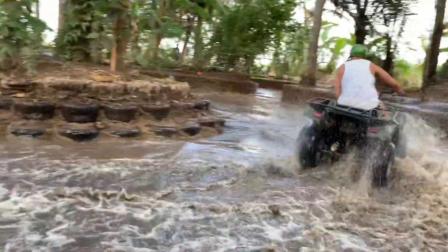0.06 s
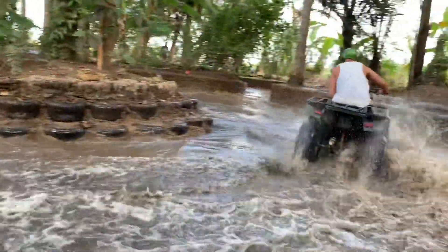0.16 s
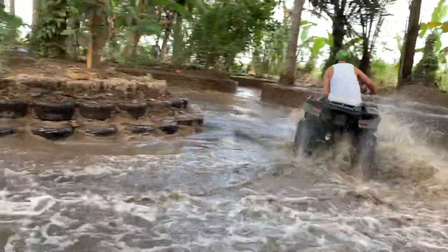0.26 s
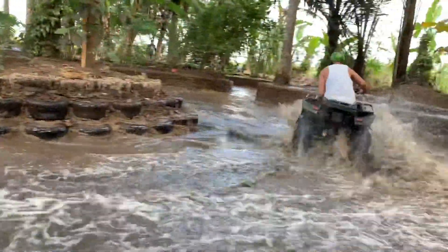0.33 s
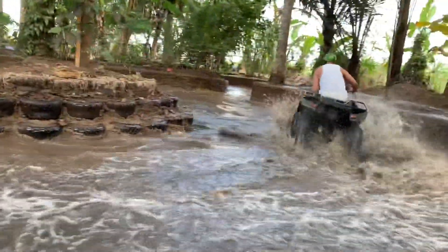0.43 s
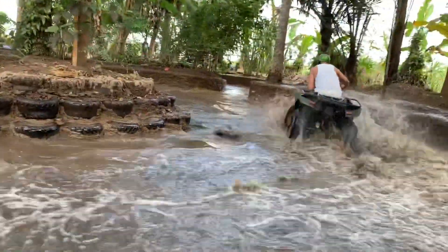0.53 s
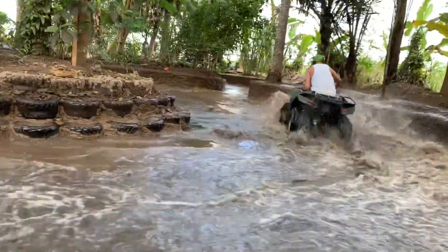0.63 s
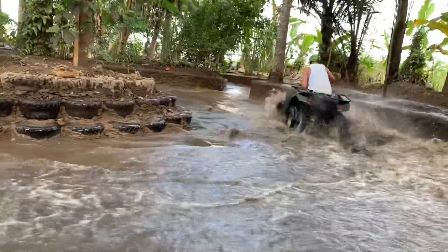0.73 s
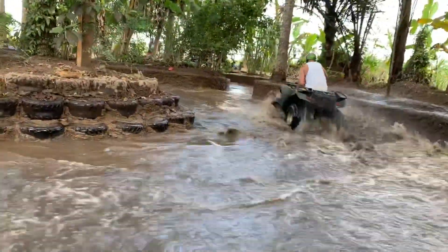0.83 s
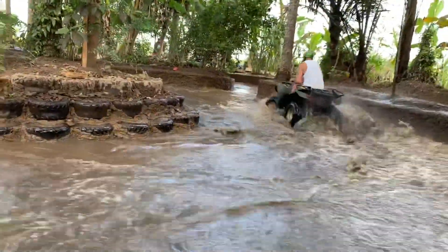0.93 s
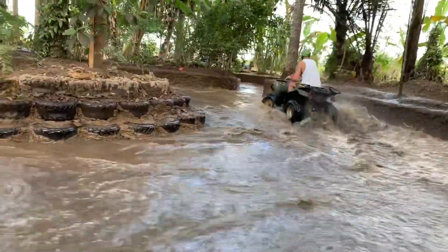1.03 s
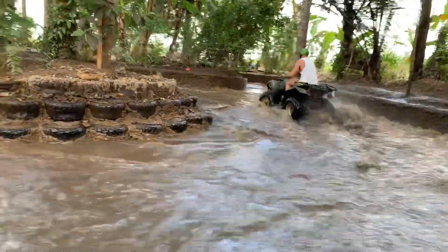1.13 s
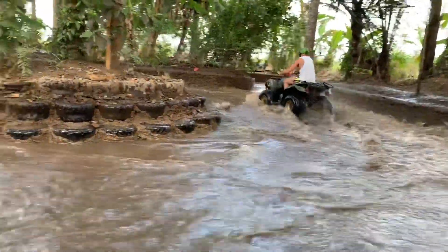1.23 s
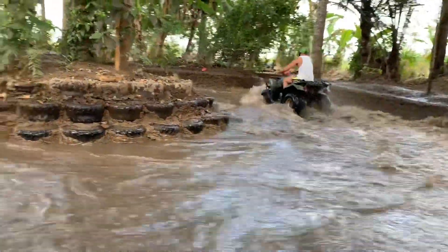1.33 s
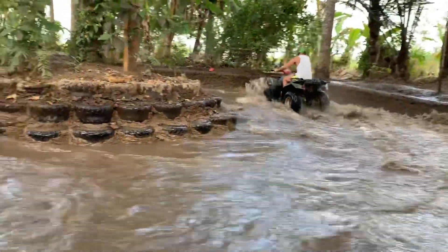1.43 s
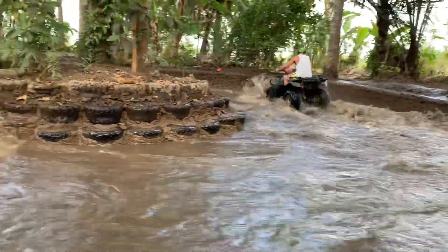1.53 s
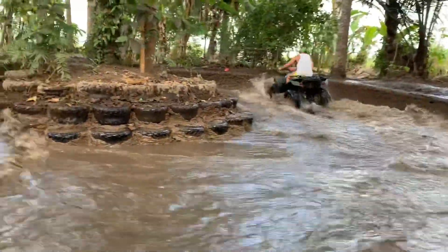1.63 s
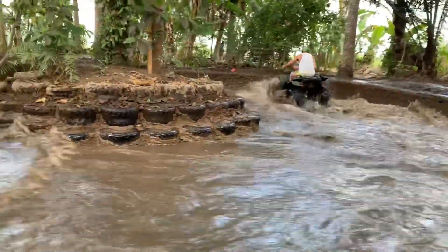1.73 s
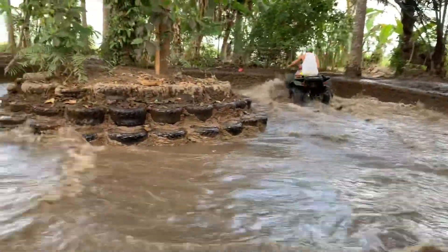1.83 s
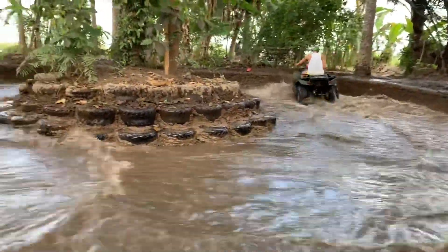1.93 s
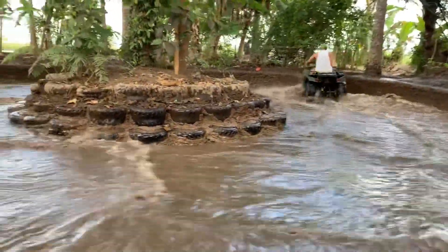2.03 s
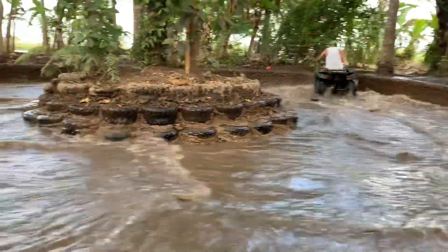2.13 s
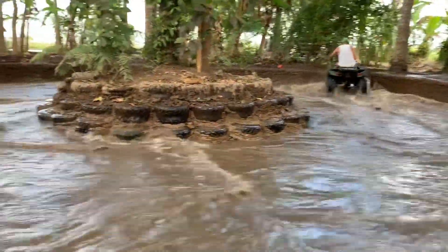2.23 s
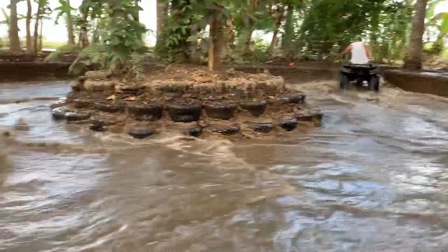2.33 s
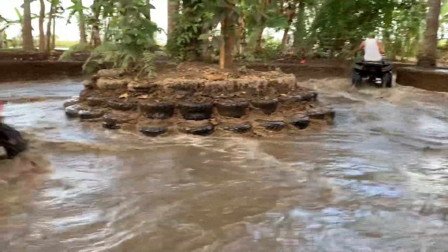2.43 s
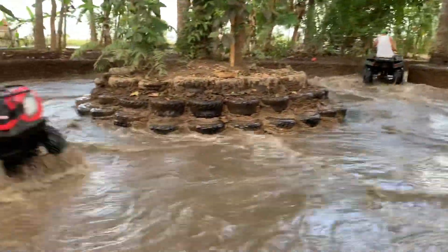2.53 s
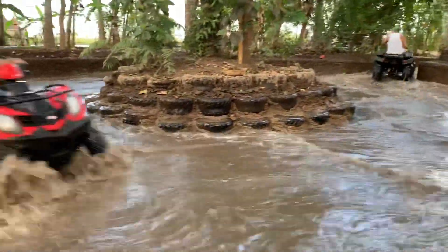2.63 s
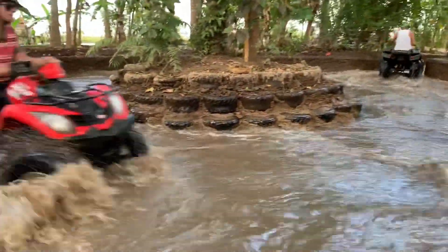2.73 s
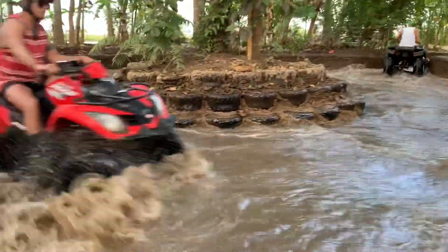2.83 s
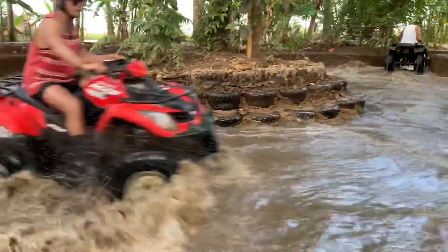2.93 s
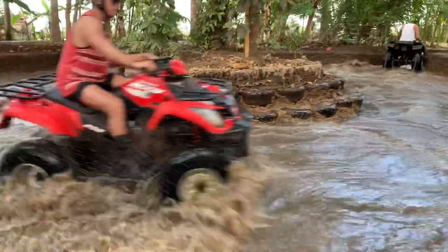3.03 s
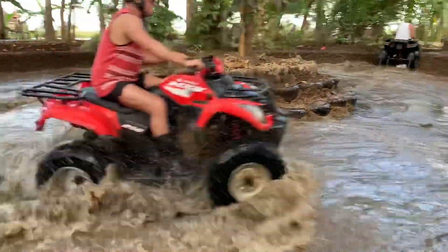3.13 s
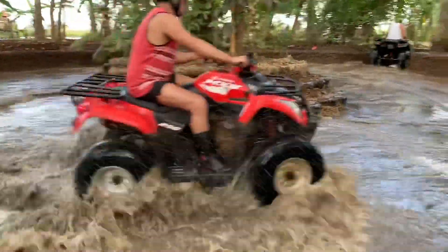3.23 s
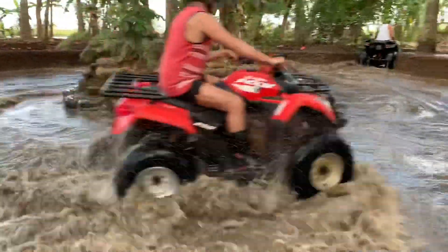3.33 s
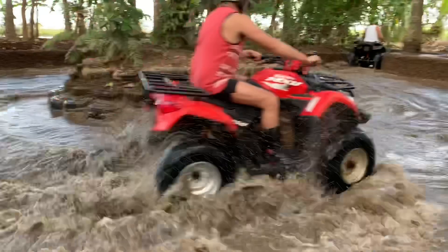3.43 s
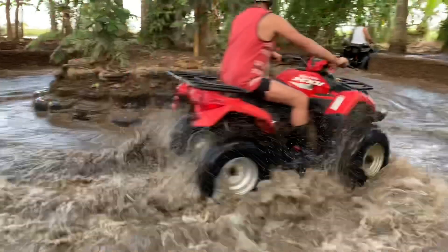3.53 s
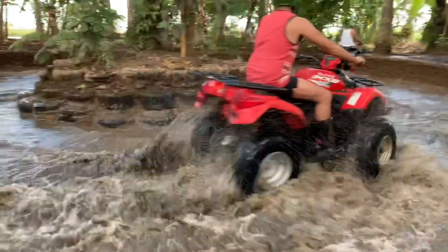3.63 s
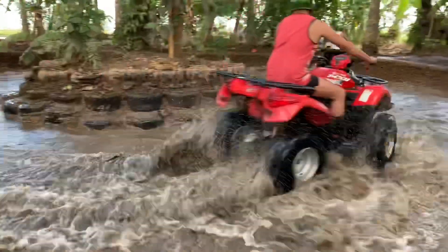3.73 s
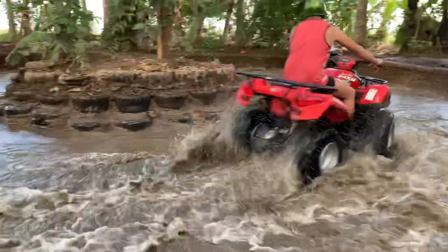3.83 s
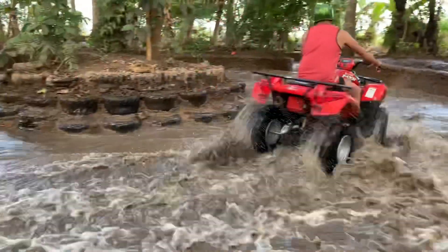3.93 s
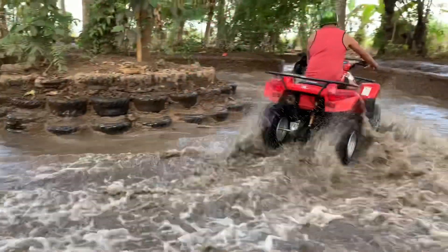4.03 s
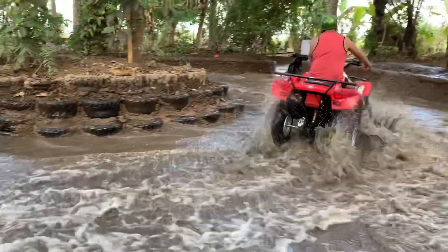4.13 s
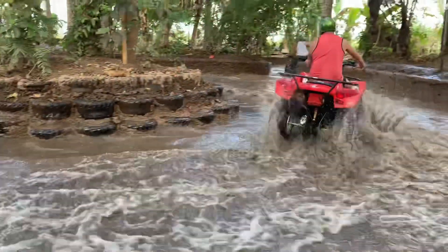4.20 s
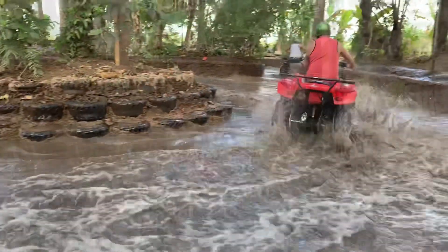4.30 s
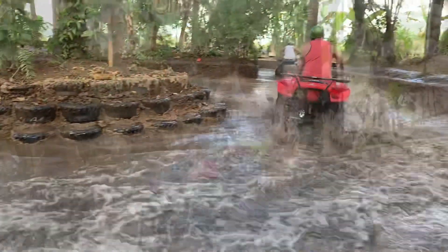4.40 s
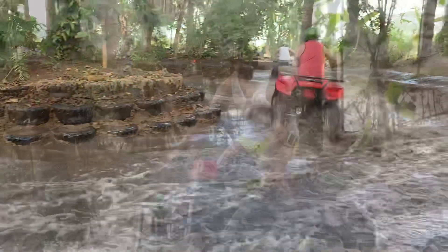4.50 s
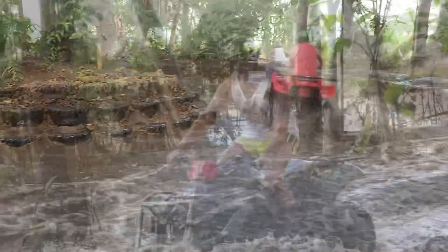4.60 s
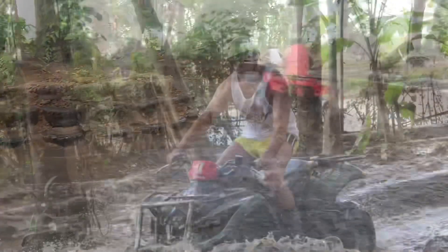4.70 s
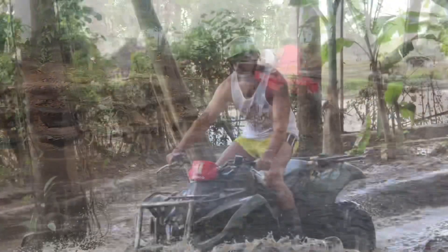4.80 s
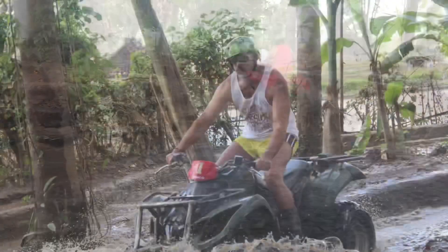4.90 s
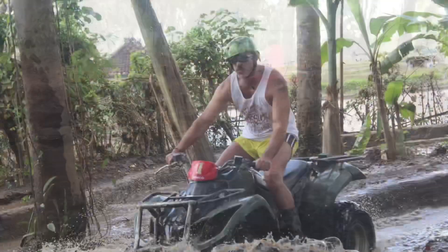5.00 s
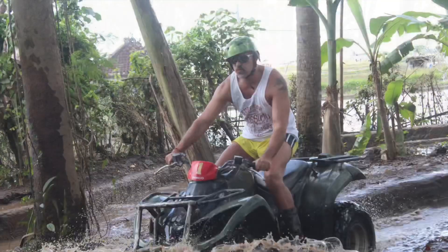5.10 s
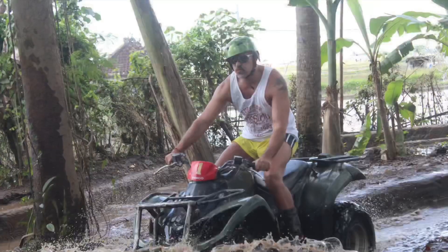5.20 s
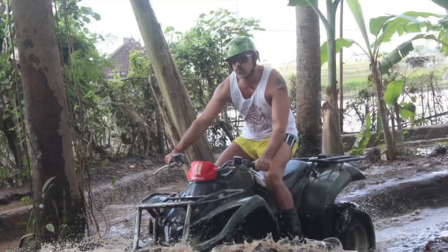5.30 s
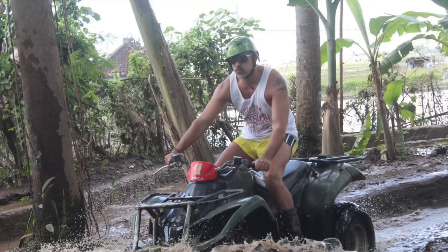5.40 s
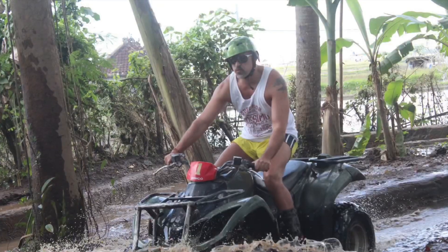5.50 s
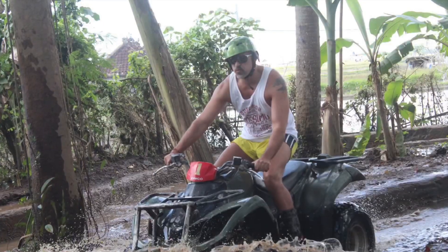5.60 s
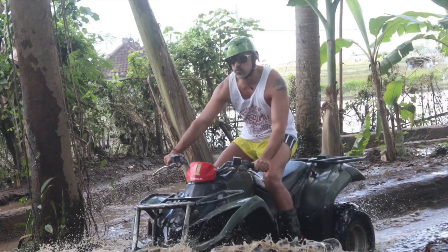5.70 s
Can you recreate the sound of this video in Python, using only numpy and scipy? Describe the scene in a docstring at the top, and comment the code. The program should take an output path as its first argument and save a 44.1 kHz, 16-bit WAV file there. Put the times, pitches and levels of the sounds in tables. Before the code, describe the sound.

Wide stereo, close outdoor pickup: continuous churning, fizzing water under two thumping single-cylinder engines. The first barks with gassy hiss, drops in speed, then gets another shorter push of throttle. The second grows from a low drone to a loud growl as it goes by, throwing heavy splashes and a big watery plop, then opens up and recedes. Short diffuse reflections from banks and trees; a gradual fade closes it.

```python
"""A muddy water pit among banks and trees: two single-cylinder quad bikes churn through it, close by.
The first blips its throttle and pulls away; the second comes up, revs past and follows it.
Each engine is a train of kicks through an exhaust colour, with a hiss of gas on every stroke.
Shaped noise and bubble rings make the water; slaps, gulps, fuzzy tones and whistles stand out from it.
Near the end a low engine hum swells again, and the whole sound fades out."""
import sys
import numpy as np
from scipy import signal
from scipy.fft import rfft, irfft, next_fast_len
from scipy.io import wavfile
from scipy.ndimage import map_coordinates

SR = 44100
rng = np.random.default_rng(int(sys.argv[2]) if len(sys.argv) > 2 else 0)


def generate_wav(sig):
    """Save sig (samples, or channels by samples) to the path in sys.argv[1] as 16-bit PCM at SR."""
    pcm = np.round(np.clip(np.atleast_2d(sig).T, -1, 1) * 32767).astype(np.int16)
    wavfile.write(sys.argv[1], SR, pcm)


N = 253575  # length in samples

# Engine speed of each quad. Each row: time in seconds, firings per second.
LEADER_SPEED = [(0, 31.43), (.07, 31.94), (.17, 33.85), (.25, 27.11), (.45, 24.33), (.62, 23.99),
                (.76, 26.06), (.9, 26.81), (1.08, 26.5), (1.33, 24.8), (1.65, 27), (1.95, 28.2), (3, 27.1)]
FOLLOWER_SPEED = [(0, 30.35), (1.25, 30.12), (1.45, 31.19), (2.14, 30.49), (2.38, 28.69), (2.57, 29.82),
                  (2.95, 30.19), (3.42, 32.66), (3.64, 32.93), (3.8, 35.77), (4.2, 35.91), (4.39, 34.95),
                  (4.55, 32.36), (4.76, 31.79), (5.2, 27.7)]
# What each exhaust passes, throttle closed and wide open. Each row: frequency in Hz, relative level in dB.
LEADER_PIPE = [(20, -44.5), (30, -15.5), (52, -10), (74, -1.5), (85, -3), (94, 9), (112, 7), (123, 6),
               (136, -8), (160, -15.5), (215, -13), (290, -26.5), (420, -27), (900, -45.5), (3000, -75.5)]
LEADER_OPEN_PIPE = [(20, -45), (32, -11), (60, -5.5), (82, -6), (100, 4), (130, 7.5), (160, 3.5),
                    (195, 2.5), (225, -3.5), (258, -3), (320, -14), (430, -12), (700, -25.5), (1200, -28.5),
                    (3000, -49.5)]
FOLLOWER_PIPE = [(20, -58.5), (31, -5), (61, 5.5), (92, -2), (108, 3.5), (124, 12), (134, 12.5), (150, 2.5),
                 (165, 1), (185, -3.5), (215, -1.5), (255, -3), (330, -14.5), (500, -29.5), (900, -43),
                 (3000, -57.5)]
FOLLOWER_OPEN_PIPE = [(20, -47), (34, -8), (70, -.5), (106, 2.5), (140, 2), (178, .5), (215, -1.5),
                      (248, -8), (290, -14), (340, -15), (430, -16), (700, -31), (1200, -35), (3000, -54)]
# Colour of each exhaust's hiss. Each row: frequency in Hz, relative density in dB per Hz.
LEADER_RASP = [(200, -6), (400, -4), (750, -8), (1030, -4.5), (1280, -8), (1560, -2.5), (1900, -4),
               (2350, 2), (3000, -20), (4200, -9), (5600, -15), (7800, -10), (10000, -10), (13500, -28),
               (16000, -24.5)]
FOLLOWER_RASP = [(200, -12), (500, -6), (1100, -11), (2100, -9.5), (3000, -4.5), (4100, -1.5), (5600, -9),
                 (7800, -2), (10000, -11.5), (13500, -13), (16000, -13.5)]
# Each quad drives straight past. The row: time when closest in seconds, closest distance in metres,
# speed in metres per second.
LEADER_PASS = (-0.46, 2.2, 2.15)
FOLLOWER_PASS = (3.61, 2, 2.29)
# Swells and throttle changes of each exhaust note; the last row of the second table is a low engine hum that
# swells near the end. # Each row: full from in seconds, full until in seconds, release time in seconds, # blend
# towards the open-throttle colour 0-1 (0 leaves the colour alone), exhaust gain in dB, rasp gain in dB.
LEADER_SWELLS = [(-.1, 0.206, 0.05, 1, 0, 17.5), (0.75, 1.09, 0.13, .65, 2.5, 10)]
FOLLOWER_SWELLS = [(1.48, 1.9, .1, 0, 0.5, -4), (2, 2.74, 0.24, 0, 2.5, -8),
                   (3.25, 3.7, .08, 0.037, 1, -0.5), (3.71, 4.057, 0.17, 0, 0, 6),
                   (3.795, 4.32, 0.36, 0.86, -0.5, 2.5), (4.93, 5.2, .1, 0, 1.5, 1.5)]
# The wheels plunge into deeper water. Each row: full from in seconds, full until in seconds,
# settling time in seconds, churn gain in dB, bow wave gain in dB.
PLUNGES = [(.2, .33, 0.1, 2.5, 0.5), (.88, 1.2, 0.19, 4, -5), (2.25, 2.6, 0.12, 1.5, 0),
           (3, 3.16, 0.043, -0.5, 3), (4.42, 4.5, 0.11, 4.5, 7.5), (4.8, 4.9, .08, 4, 5.5)]
# Colours of the water layers. Each row: frequency in Hz, relative density in dB per Hz.
CHURN_COLOUR = [(20, -23), (45, 5), (100, 7), (160, 5), (260, -5.5), (440, -3.5), (700, -12), (1200, -20),
                (3000, -61.5)]
BOW_COLOUR = [(350, -26), (700, -6.5), (1050, 3.5), (1450, -1), (2200, -22), (6000, -55)]
SPLASH_COLOUR = [(300, -37), (650, -5), (1000, -7), (1500, 0), (2300, -0.5), (3200, -19), (8000, -39.5)]
SPRAY_COLOUR = [(1500, -24.5), (2400, 1), (2900, 0.5), (4000, 1.5), (5500, -2), (7600, 1.5), (9500, -3.5),
                (12000, -9.5), (15500, -12.5)]
MIST_COLOUR = [(5000, -10), (8000, -27), (13000, -3.5), (16000, -1)]
# Stereo likeness of hiss and water at the source. Each row: frequency in Hz, left-right correlation 0-1.
LIKENESS = [(60, 0.94), (240, 0.91), (480, 0.7), (950, 0.61), (1900, 0.037), (3800, 0.044), (15000, 0.039)]
# How the banks and trees ring on. Each row: frequency in Hz, 60 dB decay time in seconds.
TREE_DECAY = [(100, 0.25), (1000, 0.025), (10000, 0.06)]
# Sheets of water slap down, and one drop lands close. Each row: start in seconds, level in dB before
# onset and decay, centre frequency in Hz, 60 dB decay time in seconds.
SLAPS = [(.066, -19.5, 2200, .03), (.85, -24.5, 1860, .1), (3.125, -19.5, 956, 0.099),
         (3.312, -20.5, 858, 0.059), (3.373, -20, 1037, .045), (3.406, -26, 1430, .05),
         (3.452, -14.5, 5990, 0.008), (3.65, -22.5, 1250, 0.036), (3.862, -25, 1240, 0.052),
         (4.152, -21.5, 1054, .04), (4.31, -23, 1110, 0.045)]
# Fuzzy tones and bands of noise, some short and gliding, one a long, wide watery hum.
# Each row: start in seconds, end in seconds, start pitch in Hz, end pitch in Hz,
# level before the swell in dB, width in Hz.
FUZZY_TONES = [(0.166, 0.244, 1160, 1060, -23.5, 260), (0.445, 1.035, 1415, 1433, -37.5, 190),
               (1.091, 1.161, 2104, 2200, -34, 260), (1.248, 2.877, 2243, 2252, -38.5, 557),
               (2.07, 2.172, 2605, 2560, -38, 70), (2.101, 2.55, 2290, 2080, -39.5, 300),
               (4.418, 4.572, 1068, 1130, -27.5, 100), (4.5, 4.643, 1220, 1350, -31, 130)]
# Brief whistles of exhaust gas. Each row: middle in seconds, peak level of the tone in dB, pitch in Hz.
CHIRPS = [(.33, -25.5, 4050), (3.949, -22, 3930), (3.978, -23.5, 4090), (4.257, -27, 4020)]
# Air pockets collapse behind the wheels. Each row: start in seconds, level in dB before onset and decay,
# starting pitch in Hz, 60 dB decay time in seconds, share of splatter.
GULPS = [(.852, -20.5, 554, 0.043, .3), (1.182, -11, 730, 0.03, .5), (1.78, -19, 717, 0.07, .4),
         (3.115, -13.5, 355, 0.16, .2), (3.141, -16.5, 966, 0.044, .3), (3.878, -1, 460, 0.048, .25),
         (3.879, -5, 610, .03, .3), (4.262, -7, 485, 0.04, .12), (4.986, -11, 482, 0.05, .15)]
# Uneven treble, with gaps in what both sides share and in what sets them apart.
# Each row: frequency in Hz, gain in dB.
MID_COLOUR = [(4500, 0), (5700, -3), (7600, 1), (9200, 0), (9700, -6), (10100, -72.5), (10800, -62),
              (11200, -6.5), (11900, 0.5), (13700, 3.5), (15500, -2)]
SIDE_COLOUR = [(4500, 0), (6000, -1), (6800, -2.5), (7600, -20), (8800, 1.5), (10400, 2.5), (12000, 4.5),
               (12800, -13.5), (13400, -18.5), (14100, -20.5), (14600, -15), (15500, 5)]
# Balance of the sides. Each row: frequency in Hz, left level over right in dB.
TILT = [(60, 0), (110, -2.8), (200, -1), (380, -1.2), (700, 1), (1290, 1.5), (2380, 1.5), (4400, -1.5),
        (8120, -.3), (15000, 0)]

# The leader's throttle snaps shut and the exhaust booms, dying away as the engine slows.
OVERRUN_S, OVERRUN_RISE_S, OVERRUN_DECAY_S, OVERRUN_DB = 0.18, .02, 0.25, 4
SWELL_RISE_S, PLUNGE_RISE_S = 0.1, 0.16  # rise times, ending where each row is full
WAVER_DB, WAVER_RATE = 0.6, 9  # the load on the wheels makes the note swell and sag: depth, changes per s
THUD_BEAM_DB = 1.2  # the exhaust note is up to this much louder from behind than from the side
# Lumps of water flung by the second quad: number a second, level when closest and its scatter;
# middle pitch, decay time and delay behind the quad.
CLOD_RATE, CLOD_DB, CLOD_SCATTER_DB = 30, -24, 3
CLOD_HZ, CLOD_T60_S, CLOD_LAG_S = 1480, 0.041, .15
CHIRP_S, CHIRP_FUZZ = 0.012, .35  # length, noise against tone
GULP_RISE = 0.036  # half the share by which a gulp's pitch climbs over its decay time
ECHO_LOW_HZ = 450  # the echo thins out below this
FADE_START_S, FADE_END_S = 4.15, 5.22
TOP_HZ = 15800  # nothing sounds above this


def amp(db):
    """Decibels to gain."""
    return 10 ** (np.asarray(db) / 20)


def unit(x):
    """Scale a signal to rms 1."""
    return x / np.sqrt(np.mean(x ** 2) + 1e-20)


def along(points, hz):
    """Read a curve of (Hz, value) points on a log frequency axis."""
    f, v = np.transpose(points)
    return np.interp(np.log(hz + 1), np.log(f + 1), v)


def curves(rows):
    """One value per sample for each column after the time."""
    s, *cols = np.transpose(rows)
    return [np.interp(np.arange(N) / SR, s, c) for c in cols]


def wobble(rate):
    """A smooth random curve with this many knots a second."""
    knots = rng.standard_normal(int(N * rate / SR) + 4)
    return map_coordinates(knots, [np.arange(N) * rate / SR], order=2)


def swells(rows, attack_s):
    """Rise, hold and release for each (full from, full until, release, values..) row; a curve per value."""
    t = np.arange(N) / SR
    total = 0
    for start, end, release_s, *values in rows:
        rise = 1 + (t - start) / attack_s
        fall = 1 - (t - end) / release_s
        total = total + np.outer(values, np.clip(np.minimum(rise, fall), 0, 1))
    return total


def filtered(x, response):
    """Shape a signal with a response given as a function of frequency."""
    m = next_fast_len(N + SR // 2, True)
    return irfft(rfft(x, m) * response(np.fft.rfftfreq(m, 1 / SR)), m)[..., :N]


def causal(points):
    """The minimum-phase impulse response of a (Hz, dB) curve, by folding its cepstrum."""
    size = 8192
    cepstrum = irfft(np.log(amp(along(points, np.fft.rfftfreq(size, 1 / SR)))))
    cepstrum[1:size // 2] *= 2
    cepstrum[size // 2 + 1:] = 0
    return irfft(np.exp(rfft(cepstrum)))


def spread(pair, spectrum):
    """Two unrelated signals become a coloured, partly alike stereo pair of rms 1."""
    def colour(hz):
        turn = np.arccos(np.clip(along(LIKENESS, hz), 0, 1)) / 2
        return amp(along(spectrum, hz)) * [np.cos(turn), np.sin(turn)]
    mid, side = filtered(pair, colour)
    return unit(np.array([mid + side, mid - side]))


def drive_by(path, lag_s=0):
    """Spreading loss in dB from the closest point, and how far the tail faces this way (-1 to 1)."""
    when, closest, speed = path
    past = speed * (np.arange(N) / SR - when - lag_s)
    distance = np.hypot(closest, past)
    return 20 * np.log10(abs(closest) / distance), past / distance


def engine(speed, pipe, open_pipe, rasp, scatter_db, jitter_s, rough, open_rough, hiss_s, hiss_floor):
    """Each firing kicks the exhaust and puffs gas: thud (closed throttle), bark (open throttle), hiss."""
    turns = np.cumsum(speed) / SR
    fire = np.flatnonzero(np.diff(np.floor(turns + .95), prepend=0) > 0)
    late, size = rng.standard_normal((len(fire), 2)).T
    when = np.clip(fire + late * jitter_s * SR, 0, N - 1).astype(int)
    kicks = np.bincount(when, amp(scatter_db * size), N)
    t = np.arange(SR // 16) / SR
    puff = unit(signal.fftconvolve(kicks, t / hiss_s * np.exp(-t / hiss_s))[:N])
    # turbulence in the puff makes every stroke a little different
    swirl = unit(puff * rng.standard_normal(N))

    def through(colour, share):
        return unit(signal.fftconvolve(unit(kicks) + share * swirl, causal(colour))[:N])
    hiss = unit(puff + hiss_floor) * spread(rng.standard_normal((2, N)), rasp)
    return through(pipe, rough), through(open_pipe, open_rough), hiss


def exhaust(thud, bark, hiss, path, note_swells, thud_db, rasp_db, beam_db):
    """Thud blends into bark, note and hiss swell or sag; both fade with distance and vary with facing."""
    near_db, facing = drive_by(path)
    opening, push_db, hiss_db = swells(note_swells, SWELL_RISE_S)
    opening = np.clip(opening, 0, 1)
    note = ((1 - opening) * thud + opening * bark) * amp(WAVER_DB * wobble(WAVER_RATE))
    note_gain = amp(thud_db + push_db + THUD_BEAM_DB * facing)
    hiss_gain = amp(rasp_db + hiss_db + beam_db * facing)  # a negative beam is quieter from behind
    return amp(near_db) * (note_gain * note + hiss_gain * hiss)


def leader():
    """The first quad: a blip of throttle, a boom as it closes, then it labours away through the water."""
    thud, bark, hiss = engine(
        curves(LEADER_SPEED)[0], LEADER_PIPE, LEADER_OPEN_PIPE, LEADER_RASP, scatter_db=.8,
        jitter_s=.00015, rough=.08, open_rough=.22, hiss_s=.0018, hiss_floor=.4)
    since = np.arange(N) / SR - OVERRUN_S
    boom = amp(OVERRUN_DB * np.exp(-np.maximum(-since / OVERRUN_RISE_S, since / OVERRUN_DECAY_S)))
    return exhaust(boom * thud, bark, hiss, LEADER_PASS, LEADER_SWELLS,
                   thud_db=-14.5, rasp_db=-37.0, beam_db=-5.5)


def follower():
    """The second quad comes up and revs past, its strokes more even; a low engine hum near the end is voiced
    here too."""
    thud, bark, hiss = engine(
        curves(FOLLOWER_SPEED)[0], FOLLOWER_PIPE, FOLLOWER_OPEN_PIPE, FOLLOWER_RASP, scatter_db=.5,
        jitter_s=.00007, rough=.07, open_rough=.07, hiss_s=.0014, hiss_floor=.08)
    return exhaust(thud, bark, hiss, FOLLOWER_PASS, FOLLOWER_SWELLS,
                   thud_db=-14.0, rasp_db=-39, beam_db=-1.5)


def bubbles(rate, hz, cycles, size_db):
    """A stream of damped rings, rising in pitch, at random times; size_db skews their levels."""
    count = int(rate * N / SR)
    start, pitch, size, side = rng.random((count, 4)).T[:, :, None]
    f = hz * 2 ** (2.4 * pitch - 1.2)
    n = np.arange(int(4 * cycles * SR / hz) + 8)
    age = f * n / SR / cycles
    tone = np.sin(2 * np.pi * cycles * age * (1 + .1 * age))
    # above 0 dB a few rings are far larger than the rest, below 0 dB a few are smaller
    ring = amp(-size_db * np.log(1 - .98 * size)) * np.exp(-3 * age) * tone
    where = ((start * N).astype(int) + n).ravel()
    gains = np.cos(2 * np.pi * side), np.sin(2 * np.pi * side)
    return unit(np.array([np.bincount(where, (ring * g).ravel(), N)[:N] for g in gains]))


def water_layer(spectrum, grains, grain_share, surge_db):
    """Rushing water with bubbles in it, surging at random as the tyre lugs dig in."""
    mix = rng.standard_normal((2, N)) + grain_share * grains
    return unit(spread(mix, spectrum) * amp(surge_db * (wobble(10) + wobble(70))))


def wake(leader_db, follower_db, pit_db, falloff, lag_s, wheelspin):
    """Gain of thrown water: it trails or leads each quad and fades with distance, over a steady pit level."""
    power = amp(pit_db) ** 2
    quads = ((leader_db, LEADER_PASS, LEADER_SWELLS), (follower_db, FOLLOWER_PASS, FOLLOWER_SWELLS))
    for db, path, note_swells in quads:
        # wheelspin follows a share of the rasp gain
        spin_db = wheelspin * swells(note_swells, SWELL_RISE_S)[2]
        power = power + amp(db + falloff * drive_by(path, lag_s)[0] + spin_db) ** 2
    return np.sqrt(power)


def water():
    """Big bubbles churn under the wheels, the bow wave gurgles, sheets splash down and droplets fizz."""
    droplets = bubbles(rate=2000, hz=6070, cycles=5, size_db=-0.5)
    gurgles = bubbles(rate=900, hz=1346, cycles=18, size_db=2.0)
    big_bubbles = bubbles(rate=260, hz=526.0, cycles=13.3, size_db=3.0)
    churn = water_layer(CHURN_COLOUR, big_bubbles, grain_share=0.16, surge_db=0.93)
    bow = water_layer(BOW_COLOUR, gurgles, grain_share=0.28, surge_db=-0.65)
    splash = water_layer(SPLASH_COLOUR, gurgles, grain_share=0.21, surge_db=0.9)
    spray = water_layer(SPRAY_COLOUR, droplets, grain_share=0.19, surge_db=0.66)
    mist = water_layer(MIST_COLOUR, droplets, grain_share=0.61, surge_db=1.0)
    plunge, bow_swell = amp(swells(PLUNGES, PLUNGE_RISE_S))
    churn *= plunge * wake(leader_db=-21.5, follower_db=-23.0, pit_db=-26,
                           falloff=0.68, lag_s=0.2, wheelspin=0.062)
    bow *= bow_swell * wake(leader_db=-33.5, follower_db=-31.5, pit_db=-52.0,
                            falloff=2.04, lag_s=-.08, wheelspin=0.27)
    splash *= wake(leader_db=-27.0, follower_db=-29.5, pit_db=-39.5,
                   falloff=1.78, lag_s=0.34, wheelspin=0.14)
    spray *= wake(leader_db=-28.5, follower_db=-31.0, pit_db=-37.5,
                  falloff=0.96, lag_s=-.05, wheelspin=0.032)
    mist *= wake(leader_db=-62.0, follower_db=-34.5, pit_db=-67.0,
                 falloff=1.4, lag_s=-.35, wheelspin=.1)
    return churn + bow + splash + spray + mist


def trees(x):
    """The banks and trees scatter a short, diffuse answer: decaying noise, 700 samples late."""
    hz, t, z = signal.stft(rng.standard_normal((2, SR // 2)), SR, nperseg=256)
    decay = amp(-60 * t / along(TREE_DECAY, hz)[:, None])
    tail = signal.istft(z * decay, SR, nperseg=256)[1]
    late = np.pad(x, (700, 0))[None]
    return signal.fftconvolve(late, tail / np.linalg.norm(tail[0]), axes=1)[:, :N]


def slap(db, hz, t60):
    """Falling water hits the surface in a broad burst of noise that dies quickly."""
    t = np.arange(SR // 5) / SR
    band = signal.butter(2, [hz / 1.4, hz * 1.4], "band", fs=SR, output="sos")
    noise = unit(signal.sosfilt(band, rng.standard_normal(len(t))))
    return amp(db - 60 * t / t60) * (1 - np.exp(-t / 0.00067)) * noise


def slaps():
    """A few big sheets slap down, amid a patter of smaller lumps behind the second quad."""
    out = np.zeros(N + SR)
    for s, db, hz, t60 in SLAPS:
        out[round(s * SR):][:SR // 5] += slap(db, hz, t60)
    near_db = drive_by(FOLLOWER_PASS, CLOD_LAG_S)[0]
    for when, size, pitch in rng.random((int(CLOD_RATE * N / SR), 3)):
        i = int(when * N)
        db = CLOD_DB + 2 * near_db[i] + CLOD_SCATTER_DB * (2 * size - 1)
        out[i:][:SR // 5] += slap(db, CLOD_HZ * 2 ** (2 * pitch - 1), CLOD_T60_S)
    return out[:N]


def fuzzy_tones():
    """Fuzzy tones and a long, wide watery hum: low-passed noise shifted up to a pitch that may glide."""
    out = np.zeros(N)
    for start, end, from_hz, to_hz, db, width in FUZZY_TONES:
        u = np.linspace(0, 1, max(int((end - start) * SR), 64))
        lowpass = signal.butter(2, width / 2, fs=SR, output="sos")
        fuzz = signal.sosfilt(lowpass, rng.standard_normal((len(u), 2)) @ [1, 1j])
        pitch_hz = from_hz + (to_hz - from_hz) * u
        tone = (fuzz * np.exp(2j * np.pi * np.cumsum(pitch_hz) / SR)).real
        swell = np.sqrt(4 * u * (1 - u))
        out[round(start * SR):][:len(u)] += amp(db) * unit(tone) * swell
    return out


def chirps():
    """A puff of gas whistles for a few milliseconds: a sine with some noise under a smooth hump."""
    out, t = np.zeros(N), np.arange(int(CHIRP_S * SR)) / SR
    for s, db, hz in CHIRPS:
        whistle = np.sin(2 * np.pi * hz * t) + CHIRP_FUZZ * rng.standard_normal(len(t))
        out[round((s - CHIRP_S / 2) * SR):][:len(t)] += amp(db) * np.hanning(len(t)) * whistle
    return out


def gulps():
    """Air pockets collapse behind a wheel: each rings briefly, rising in pitch, in a burst of splatter."""
    out, t = np.zeros(N + SR), np.arange(SR // 5) / SR
    for s, db, hz, t60, share in GULPS:
        ring = np.sin(2 * np.pi * hz * t * (1 + GULP_RISE * t / t60))
        resonance = signal.iirpeak(hz, 1.2, SR)
        splatter = unit(signal.lfilter(*resonance, rng.standard_normal(len(t))))
        envelope = amp(db - 60 * t / t60) * (1 - np.exp(-t / 0.0016))
        out[round(s * SR):][:len(t)] += envelope * (ring + share * splatter)
    return out[:N]


def scene():
    """Both quads in the water, among the trees."""
    near = leader() + follower() + slaps() + fuzzy_tones() + chirps() + gulps()
    # trunks scatter little bass
    echo = filtered(trees(near.mean(axis=0)), lambda hz: hz ** 2 / (hz ** 2 + ECHO_LOW_HZ ** 2))
    return near + amp(-4.5) * echo + water()


def record(dry):
    """Uneven treble, a fade-out, rounded peaks, sides that differ in level, and a cut-off top."""
    mid = filtered(dry[0] + dry[1], lambda hz: amp(along(MID_COLOUR, hz))) / 2
    side = filtered(dry[0] - dry[1], lambda hz: amp(along(SIDE_COLOUR, hz))) / 2
    fade = np.interp(np.arange(N) / SR, [FADE_START_S, FADE_END_S], [1, 0])
    heard = np.array([mid + side, mid - side]) * fade
    heard = heard / (1 + np.abs(heard / .97) ** 8) ** (1 / 8)  # peaks bend over towards 0.97
    halves = np.array([[.5], [-.5]])  # half the tilt lifts the left, half lowers the right
    return filtered(heard, lambda hz: amp(halves * along(TILT, hz)) * (hz < TOP_HZ))


dry = scene()
out = record(dry)
generate_wav(out)
```